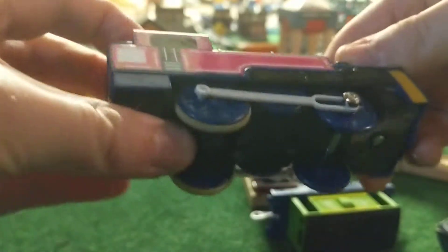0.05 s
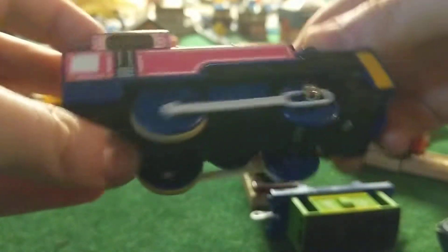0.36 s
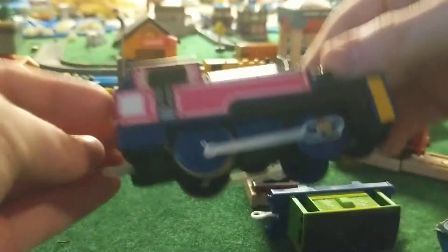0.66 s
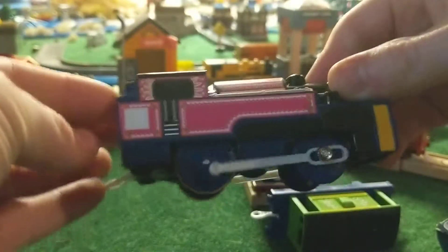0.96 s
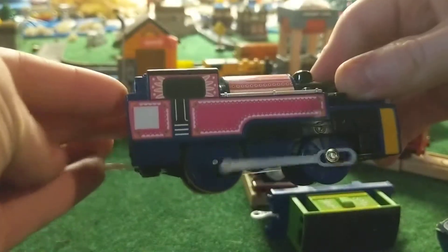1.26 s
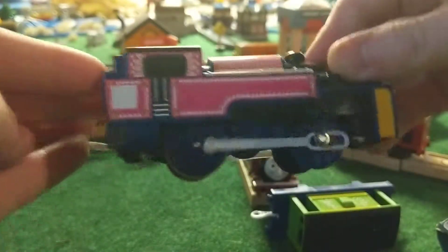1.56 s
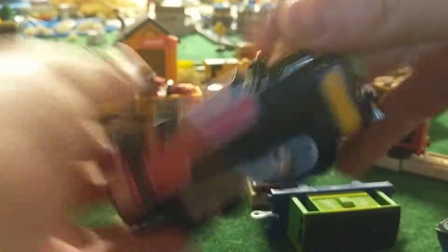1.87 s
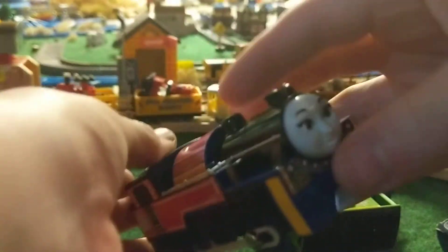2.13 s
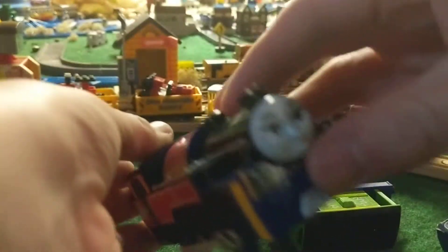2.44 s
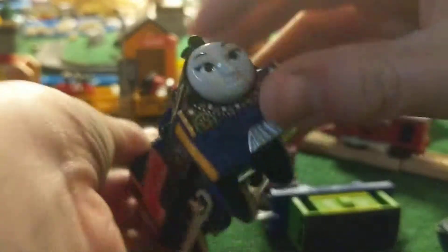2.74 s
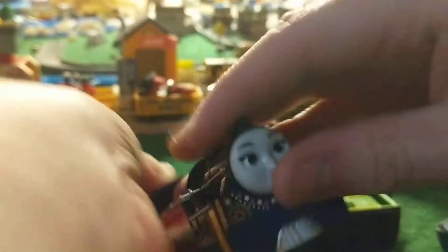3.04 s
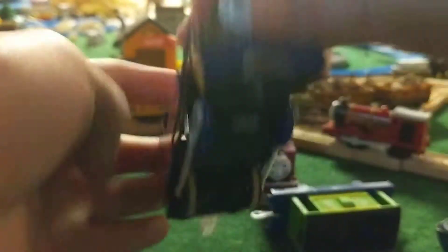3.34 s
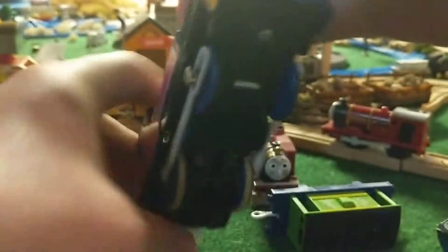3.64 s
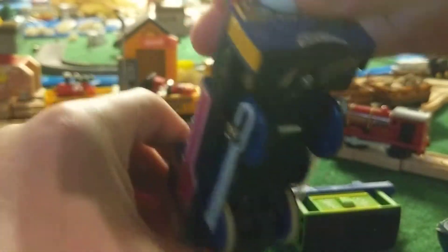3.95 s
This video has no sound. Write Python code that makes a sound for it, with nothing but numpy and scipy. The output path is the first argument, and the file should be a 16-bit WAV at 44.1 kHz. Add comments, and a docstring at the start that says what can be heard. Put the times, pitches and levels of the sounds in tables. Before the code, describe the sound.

A small toy motor clicks on and whirrs close up, with four sharp snaps midway.

```python
"""A toy locomotive in the hand, close to the microphone, in a quietly humming room.
A finger nudges and throws the switch; the small motor spins up and the plastic gears whirr,
coloured differently by the shell in each grip. Halfway through, the wheels are held briefly: the motor
labours and the drive slips with four snaps. The motor picks up again, then a hand bumps and covers
the microphone for a moment while the toy runs on."""
import sys
import numpy as np
from scipy import signal
from scipy.fft import rfft, irfft, next_fast_len
from scipy.io import wavfile
from scipy.ndimage import map_coordinates

SR = 44100
rng = np.random.default_rng(int(sys.argv[2]) if len(sys.argv) > 2 else 0)


def materialize(psi):
    """Save the field psi as 16-bit PCM at rate SR to the path in sys.argv[1].

    A 1-D psi becomes a single channel; in a 2-D psi each row is a channel.
    """
    bounded = np.clip(np.atleast_2d(psi).T, -1, 1)
    quanta = np.round(bounded * 32767).astype(np.int16)
    wavfile.write(sys.argv[1], SR, quanta)


N = 176400
START_S, HELD_S, FREED_S = .243, 2.1, 2.52  # motor on, wheels held, wheels let go
TURN_S = .16  # time to turn the toy in the hand

# The whirr, close up. Each row: time in seconds, level in dB.
WHIRR_LEVELS = [(.243, -39.5), (.4, -32.5), (.7, -32.5), (.9, -34.5), (2.0, -33), (2.05, -24.5),
                (2.085, -22.5), (2.13, -30.5), (2.23, -33.5), (2.46, -33), (2.85, -30), (3.27, -30.5),
                (3.65, -31.5), (3.82, -30)]
# The gears' whine at free speed. Each row: multiple of the shaft rate, level against the whirr in dB
# with the toy side-on to the microphone, the same end-on.
GEAR_WHINE = [(8, -45, -36), (10, -40, -26), (11, -22, -25.5), (15, -40, -28), (16, -27, -23),
              (29, -32, -26), (30, -21, -36), (94, -37, -35)]
# The commutator's buzz. Each row: frequency in Hz, relative gain in dB.
BRUSH_COLOUR = [(7000, -38), (10500, 3), (14500, -6)]
def motor(free_hz=130.2, tooth_count=10, wheel_ratio=3, worn_db=-4, brush_db=-25):
    """Teeth strike and rasp, hardest once a turn, over a slower worn wheel; gears whine, brushes buzz."""
    t, speed = clock(), shaft_speed()
    turns = np.cumsum(free_hz * speed) / SR
    push = amp(3 * np.cos(2 * np.pi * turns) + 2.2 * wobble(300) + .9 * wobble(15))
    teeth = unit(tooth_strikes(turns, tooth_count, jitter_s=.00003, scatter_db=2))
    wheel = surface(turns / wheel_ratio, size=840)
    rasp = rng.standard_normal(N)
    gears = shell(push * (unit(teeth + rasp) + amp(worn_db) * wheel))
    end_on = ramp(FREED_S, TURN_S)
    whine = np.zeros(N)
    for multiple, side_db, end_db in GEAR_WHINE:
        db = side_db + end_on * (end_db - side_db) + 2 * wobble(6.83)
        whine += amp(db) * unit(np.sin(2 * np.pi * multiple * turns))
    brushes = unit(through(surface(turns), colour(BRUSH_COLOUR)))
    level = amp(np.interp(t, *np.transpose(WHIRR_LEVELS))) * (t > START_S)
    return level * (gears + speed ** 4 * (whine + amp(brush_db) * brushes))


def shaft_speed(spin_up_s=.055, creep=.045, creep_s=.65, sag=.23, load_lag_s=.1):
    """Share of the free speed: a quick spin-up, a slow creep, a sag while the wheels are held."""
    def rise(start_s, lag_s):
        return 1 - np.exp(-np.maximum(clock() - start_s, 0) / lag_s)
    running = (1 - creep) * rise(START_S, spin_up_s) + creep * rise(START_S, creep_s)
    load = rise(HELD_S, load_lag_s) - rise(FREED_S, load_lag_s)
    waver = 1 + .002 * wobble(3) + .001 * wobble(25)
    return running * (1 - sag * load) * waver


def tooth_strikes(turns, count, jitter_s, scatter_db):
    """Teeth meet count times a turn, on either flank, uneven in time and force."""
    due = np.interp(np.arange(1, int(turns[-1] * count)) / count, turns, np.arange(N))
    late, force, flank = rng.standard_normal((len(due), 3)).T
    struck = np.clip(due + jitter_s * SR * late, 0, N - 1).astype(int)
    return np.bincount(struck, np.sign(flank) * amp(scatter_db * force), N)


def surface(turns, size=280):
    """The roughness of a rotating part: random, but the same at every turn."""
    return unit(map_coordinates(rng.standard_normal(size), [turns % 1 * size], mode="grid-wrap"))


# The shell as the microphone hears it in five grips. Each row: frequency in Hz, relative gain in dB.
GRIP_TILTED = [(290, -59), (500, -20.5), (795, -22), (1080, -14), (1280, -2), (2040, -3.5), (2260, -14.5),
               (3290, 0), (4280, 0.5), (4660, -8), (5020, 1), (5970, 0.5), (10500, -21.5), (16000, -26)]
GRIP_SIDE_ON = [(350, -45), (600, -20.5), (800, -24), (950, -12.5), (1230, -17), (1400, -6), (1800, -6.5),
                (2240, -2), (2740, -10.5), (3250, 0.5), (3620, -2.5), (3900, 1.5), (4270, 1.5), (4430, -4),
                (4680, 4), (5130, -6), (5750, -0.5), (7200, -12.5), (11000, -21.5), (16000, -34)]
GRIP_HELD = [(290, -43), (1060, -22.5), (1380, -2), (1740, -10), (2070, -2), (2260, -8), (2980, -4),
             (4730, 1.5), (5390, -8), (6330, 2.5), (8580, -13), (14000, -26)]
GRIP_FACE_ON = [(290, -59), (500, -28.5), (1100, -29.5), (1380, -12.5), (1800, -21), (2080, -8.5),
                (2300, -13.5), (3350, -8), (4000, -8), (4520, -1), (5130, -12.5), (5700, -0.5),
                (6080, -1.5), (6700, -13.5), (7450, -9), (8700, -24), (16000, -33.5)]
GRIP_UPENDED = [(290, -70), (500, -24), (1150, -20.5), (1320, -5.5), (1700, -11), (2020, 0), (2400, -11),
                (3100, -0.5), (3600, 0.5), (4130, -5.5), (4500, 0), (5100, -3.5), (5650, 3), (6150, 2),
                (6500, -9), (7700, -9.5), (8700, -21.5), (16000, -32)]
# Narrow shell modes, heard in every grip. Each row: frequency in Hz, boost in dB.
NARROW_MODES = [(3340, 2), (3490, 2.5), (3855, 5), (4260, 2.5), (4620, 1.5), (4775, 3)]
# The brightest resonance as the toy is turned. Each row: time in seconds, boost in dB.
BRIGHT_BOOST = [(1.4, -1), (1.7, 4.5), (2.4, 1.5), (2.85, 3.5), (3.25, 1), (3.44, 3), (3.54, -0.5)]
def shell(drive, regrips_s=(.75, 2.02, 2.58, 3.47)):
    """Each grip colours the gear noise in turn; the shell's own modes ring on top."""
    grips = [GRIP_TILTED, GRIP_SIDE_ON, GRIP_HELD, GRIP_FACE_ON, GRIP_UPENDED]
    reached = [1] + [ramp(s, TURN_S) for s in regrips_s] + [0]
    body = sum((reached[k] - reached[k + 1]) * unit(through(drive, colour(grip)))
               for k, grip in enumerate(grips))
    body += sum((amp(db) - 1) * resonance(body, hz, width_hz=43) for hz, db in NARROW_MODES)
    boost = amp(np.interp(clock(), *np.transpose(BRIGHT_BOOST)))
    return body + (boost - 1) * resonance(body, hz=5700, width_hz=790)


# The slipping drive, close up. Each row: start in seconds, crack level in dB, strength of the
# impulses behind the thud and the knock in dB, pitch factor of the crack.
SLIPS = [(2.1777, -5.5, 4, 10, 1.035), (2.2847, -4.5, 13.5, -10, .98), (2.3836, -6.5, 14, 7, 1.02),
         (2.4868, -6.5, -8, -14, 1.02)]
# The crack and the thud. Each row: frequency in Hz, gain in dB.
CRACK_COLOUR = [(240, -47), (400, -23.5), (1130, -22.5), (1440, -12), (1680, -15), (2970, -12.5),
                (3420, -2), (3750, -13), (4250, -3), (6340, -4.5), (6900, 4), (8630, -8.5), (10200, -8),
                (16000, -17)]
THUD_COLOUR = [(25, -16), (70, 1.5), (170, 2.5), (1400, -22.5)]
def snaps():
    """The held drive slips: each snap cracks, thuds and knocks the hollow shell."""
    cracks, thuds, knocks = np.zeros((3, N))
    for s, db, thud_db, knock_db, pitch in SLIPS:
        shifted = [(hz * pitch, gain) for hz, gain in CRACK_COLOUR]
        cracks += bursts([(s, db)], shifted, attack_s=.00048, hold_s=.0019, t60_s=.0128)
        thuds[round(s * SR)] = amp(thud_db)
        knocks[round(s * SR)] = amp(knock_db)
    return cracks + through(thuds, colour(THUD_COLOUR)) + resonance(knocks, hz=690, width_hz=340)


# Small contacts on the toy, close up. Each row: start in seconds, level in dB.
FINGER_NUDGES = [(.046, -49), (.0585, -35.5), (.067, -41)]
PLASTIC_TICKS = [(.992, -29.5), (1.852, -30.5), (1.947, -36), (2.041, -27), (2.1105, -24.5), (2.8, -25),
                 (3.017, -28.5), (3.94, -33)]
# How a nudge, the switch and a tick ring. Each row: frequency in Hz, relative gain in dB.
NUDGE_COLOUR = [(350, -45), (939, -37), (1220, -4.5), (1820, -11), (2660, -25), (7050, -26), (14000, -52)]
SWITCH_COLOUR = [(200, -32), (480, -28), (900, -15), (1250, -0.5), (1450, -9), (1880, 2.5), (2500, -24),
                 (3650, -2.5), (4100, -15), (4700, 1), (5600, -3.5), (7500, -9.5), (14000, -17.5)]
TICK_COLOUR = [(1500, -14), (6800, 3.5), (10000, 1.5), (16000, -16)]
def clicks():
    """The switch is nudged, a faint hiss follows, then it clicks; later, loose plastic ticks."""
    nudges = bursts(FINGER_NUDGES, NUDGE_COLOUR, attack_s=.0011, hold_s=.002, t60_s=.021)
    faint_hiss = bursts([(.186, -52.5)], TICK_COLOUR, attack_s=.008, hold_s=.02, t60_s=.36)
    switch = bursts([(.2413, -6.5)], SWITCH_COLOUR, attack_s=.0014, hold_s=.0026, t60_s=.0084)
    ticks = bursts(PLASTIC_TICKS, TICK_COLOUR, attack_s=.0002, hold_s=.0013, t60_s=.017)
    return nudges + faint_hiss + switch + ticks


# Handling noise, right on the microphone. Each row: start in seconds, rub and boom strengths in dB.
HAND_BUMPS = [(3.077, -34.5, -55), (3.099, -25.5, -23.5), (3.17, -23, -22), (3.194, -34, -39)]
# Skin on the case. Each row: frequency in Hz, relative gain in dB.
RUB_COLOUR = [(30, -12), (120, -3), (600, -2), (850, -10), (1150, -9.5), (5000, -40)]
def bumps(boom_hz=62, boom_t60_s=.12, boom_lag_s=.0043):
    """Skin rubs on the microphone's case, and the case booms."""
    rubs = [(s, db) for s, db, _ in HAND_BUMPS]
    out = bursts(rubs, RUB_COLOUR, attack_s=.0039, hold_s=.0059, t60_s=.054)
    for s, _, db in HAND_BUMPS:
        t = np.maximum(clock() - s - boom_lag_s, 0)
        swell = 2 * (1 - np.exp(-t / .011))
        out += swell * amp(db - 60 * t / boom_t60_s) * np.sin(2 * np.pi * boom_hz * t)
    return out


# The toy heard through the hand. Each row: frequency in Hz, gain in dB.
HAND_COLOUR = [(300, 11), (1500, 1.5), (5500, -8.5), (8000, -31), (16000, 1)]
def hand_cover(x, on_s=3.098, off_s=3.184, fade_s=.005):
    """A hand over the microphone briefly lifts the bass and hollows out the treble."""
    cover = ramp(on_s, fade_s) - ramp(off_s, fade_s)
    return (1 - cover) * x + cover * through(x, colour(HAND_COLOUR))


def room(x, tail_t60_s=.097, tail_db=-18.5, echo_s=.0146, echo_db=-22):
    """A scattered echo from the play table nearby, and a short faint tail."""
    t = np.arange(SR // 3) / SR
    tail = rng.standard_normal(len(t)) * amp(-60 * t / tail_t60_s) * (t > .004)
    echo = rng.standard_normal(len(t)) * np.exp(-np.abs(t - echo_s) / .0035)
    response = amp(tail_db) * tail / np.linalg.norm(tail) + amp(echo_db) * echo / np.linalg.norm(echo)
    return x + through(x, response)


# An appliance in the background. Each row: frequency in Hz, level in dB.
APPLIANCE_HUM = [(119.5, -54), (231, -55.5)]
# The air of the room. Each row: frequency in Hz, relative gain in dB.
AIR_COLOUR = [(20, -59), (40, -14), (80, -6.5), (180, -1), (270, -2.5), (350, -11.5), (750, -21.5),
              (14000, -41)]
def room_tone(air_db=-48.5):
    """An appliance's wavering hum over low air noise."""
    hum = np.zeros(N)
    for hz, db in APPLIANCE_HUM:
        level = amp(db + 2.44 * wobble(5.09))
        hum += level * unit(np.sin(2 * np.pi * hz * clock() + .49 * wobble(5.69)))
    air = unit(through(rng.standard_normal(N), colour(AIR_COLOUR)))
    return hum + amp(air_db) * air


def bursts(rows, points, attack_s, hold_s, t60_s):
    """Noise bursts ringing through one colour. Each of the rows: start in seconds, level in dB."""
    chatter, body = np.zeros(N + SR), colour(points)
    t = np.arange(SR // 5) / SR
    shape = np.minimum(t / attack_s, 1) * amp(-60 * np.maximum(t - hold_s, 0) / t60_s)
    for s, db in rows:
        chatter[round(s * SR):][:len(t)] += amp(db) * shape * np.sign(rng.standard_normal(len(t)))
    return through(chatter[:N], body / np.linalg.norm(body))


def colour(points, size=4096):
    """Minimum-phase impulse response with the (Hz, dB) gains."""
    hz, db = np.transpose(points)
    gain_db = np.interp(np.log(np.fft.rfftfreq(size, 1 / SR) + 1), np.log(hz + 1), db)
    cepstrum = irfft(np.log(amp(gain_db) + 1e-6))
    cepstrum[1:size // 2] *= 2
    cepstrum[size // 2 + 1:] = 0
    return irfft(np.exp(rfft(cepstrum)))


def resonance(x, hz, width_hz):
    """The part of x that one mode answers."""
    return signal.lfilter(*signal.iirpeak(hz, hz / width_hz, SR), x)


def through(x, response):
    return signal.fftconvolve(x, response)[:N]


def wobble(rate):
    """A smooth random curve, rate knots a second."""
    return map_coordinates(rng.standard_normal(int(N * rate / SR) + 4), [clock() * rate])


def ramp(centre_s, length_s):
    """A straight rise from 0 to 1."""
    return np.clip((clock() - centre_s) / length_s + .5, 0, 1)


def amp(db):
    return 10 ** (np.asarray(db) / 20)


def unit(x):
    return x / np.sqrt(np.mean(x ** 2) + 1e-20)


def clock():
    return np.arange(N) / SR


def scene():
    """One microphone close to the toy, with handling noise on it and the room behind."""
    toy = room(motor() + clicks() + snaps())
    return (hand_cover(toy) + bumps() + room_tone())[None]


def record(dry, ceiling=.72, top_hz=16900, edge_hz=1100):
    """The recorder rounds off the loudest peaks and keeps nothing above its band limit."""
    rounded = dry / (1 + np.abs(dry / ceiling) ** 4) ** (1 / 4)
    size = next_fast_len(N + SR // 2)
    passband = np.clip((top_hz - np.fft.rfftfreq(size, 1 / SR)) / edge_hz, 0, 1)
    return irfft(rfft(rounded, size) * passband, size)[..., :N]


dry = scene()
out = record(dry)
materialize(out)
```